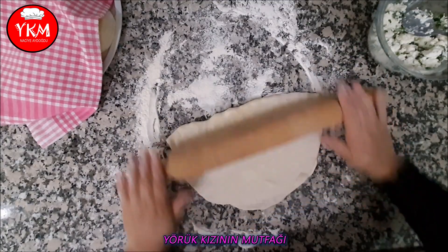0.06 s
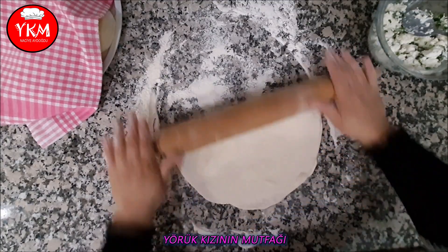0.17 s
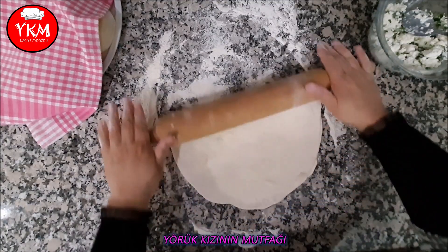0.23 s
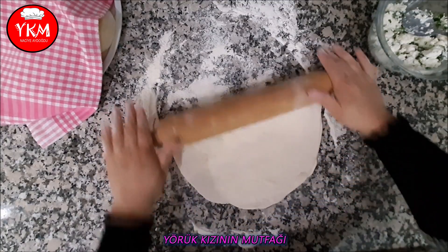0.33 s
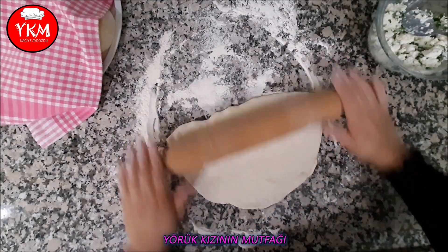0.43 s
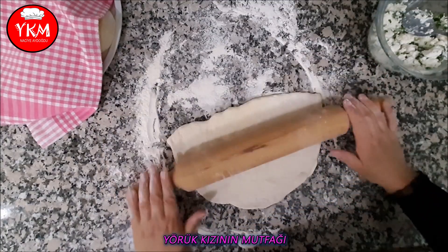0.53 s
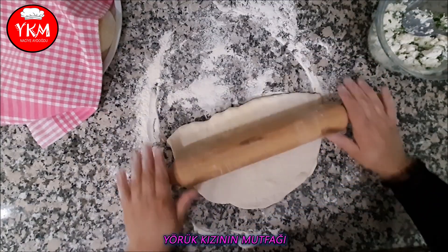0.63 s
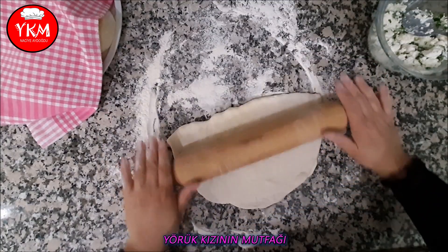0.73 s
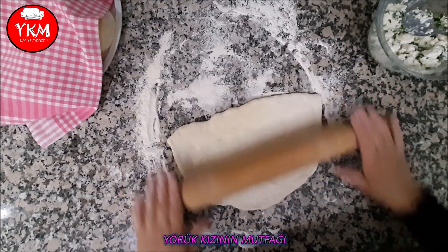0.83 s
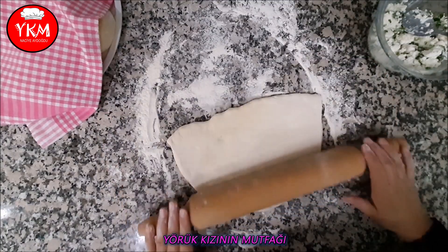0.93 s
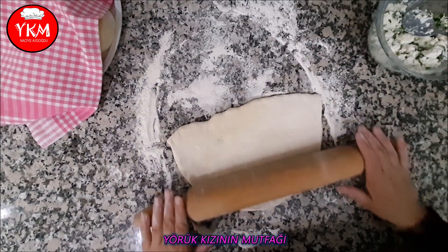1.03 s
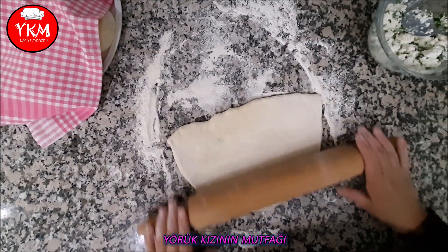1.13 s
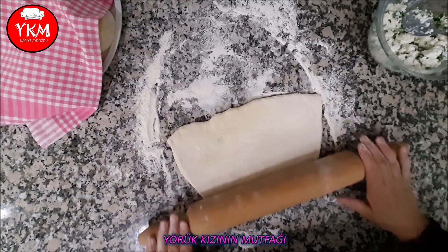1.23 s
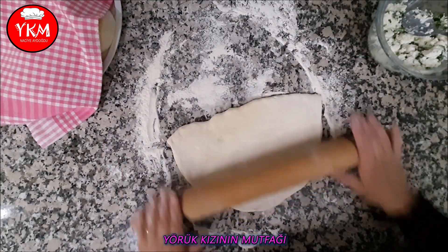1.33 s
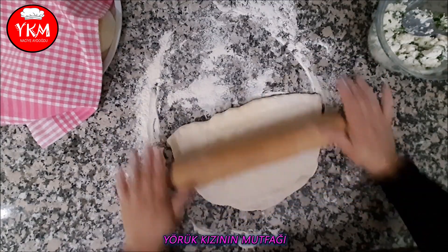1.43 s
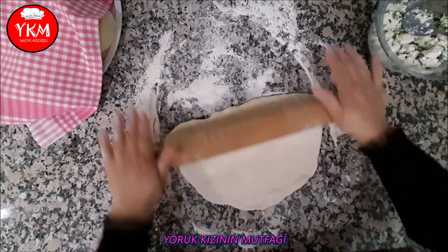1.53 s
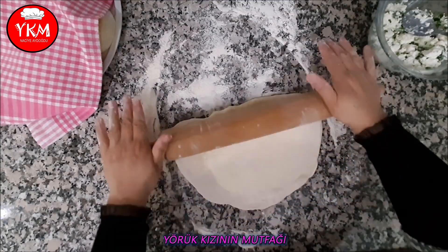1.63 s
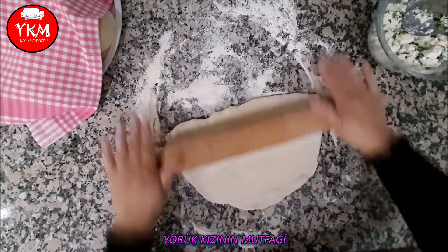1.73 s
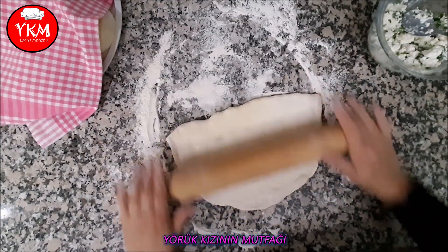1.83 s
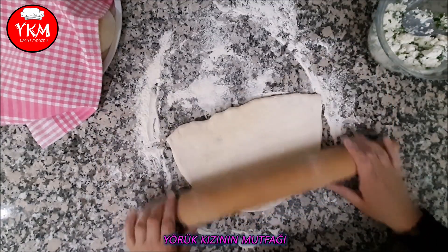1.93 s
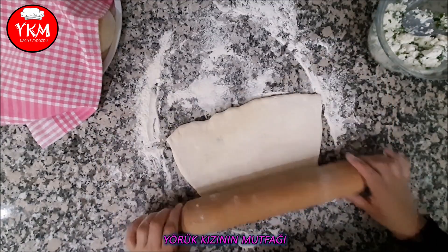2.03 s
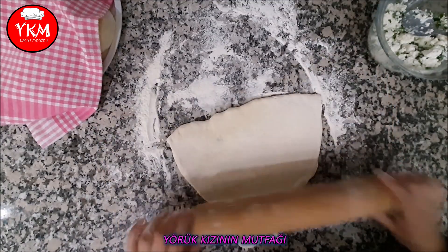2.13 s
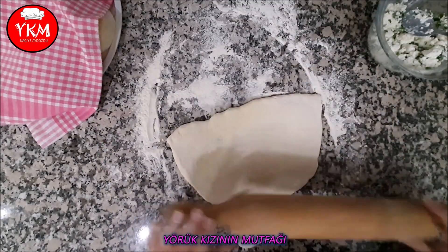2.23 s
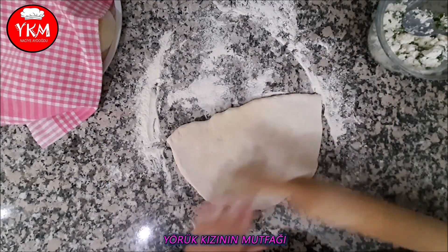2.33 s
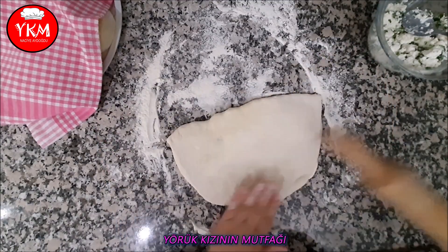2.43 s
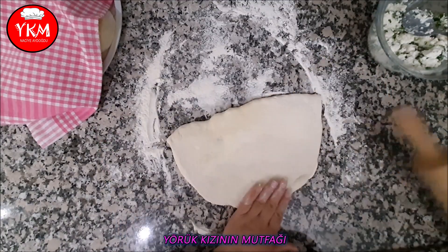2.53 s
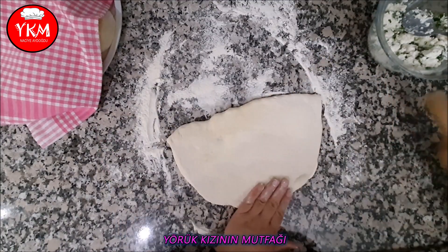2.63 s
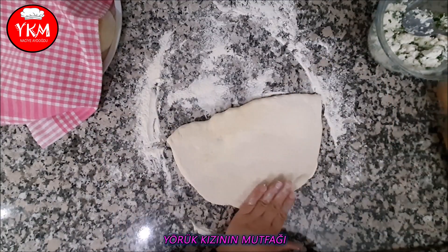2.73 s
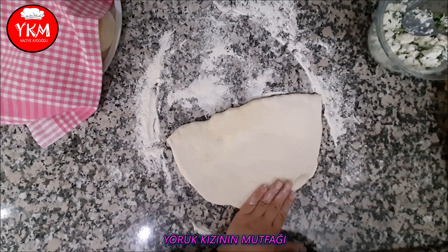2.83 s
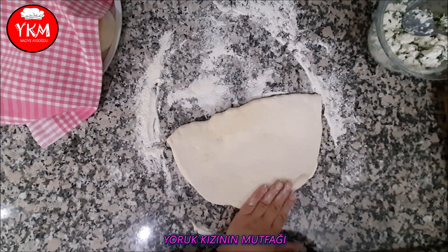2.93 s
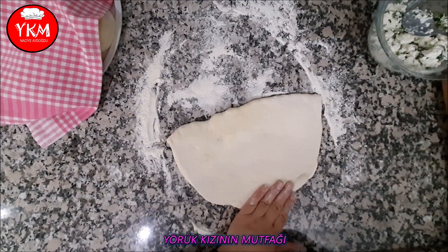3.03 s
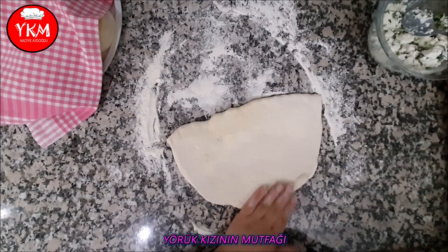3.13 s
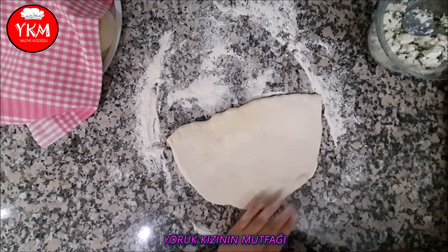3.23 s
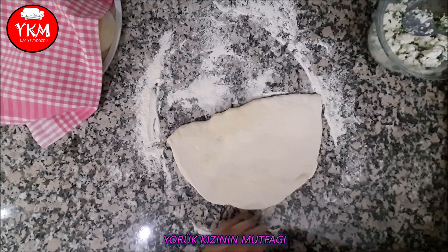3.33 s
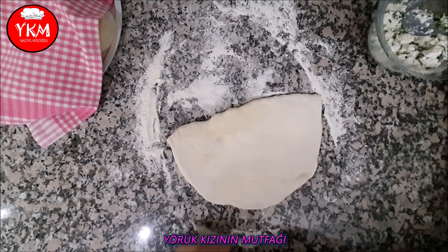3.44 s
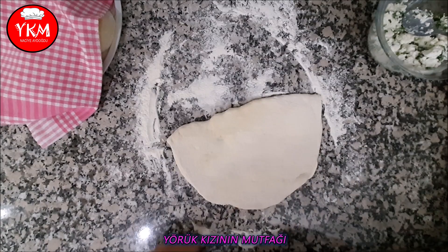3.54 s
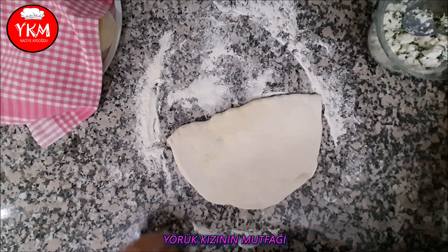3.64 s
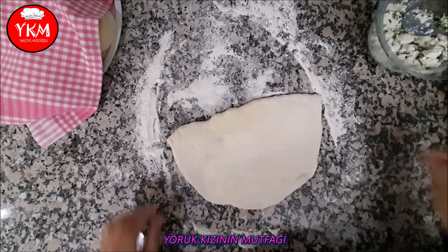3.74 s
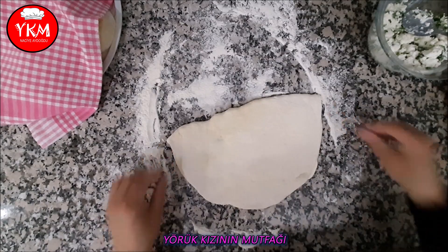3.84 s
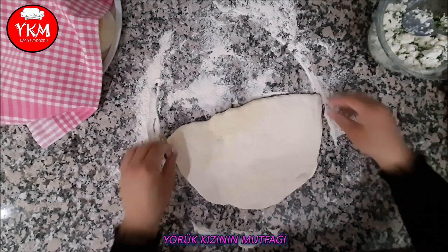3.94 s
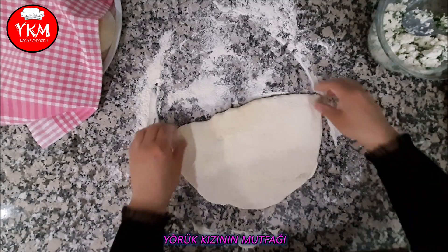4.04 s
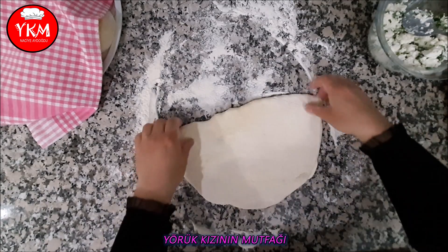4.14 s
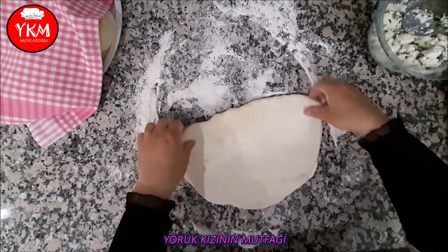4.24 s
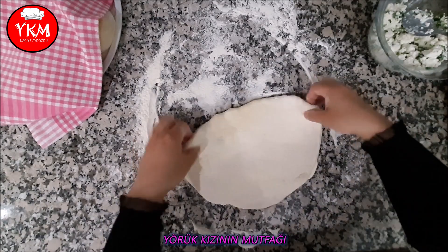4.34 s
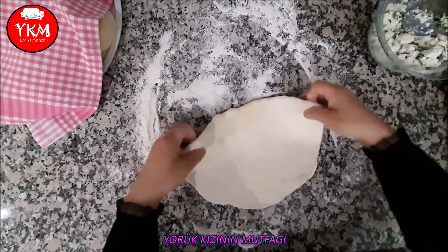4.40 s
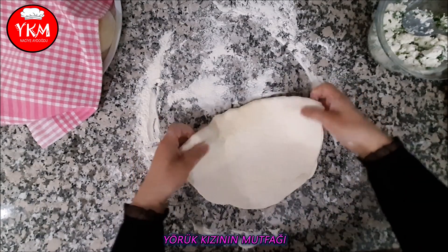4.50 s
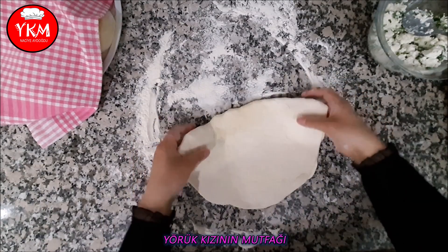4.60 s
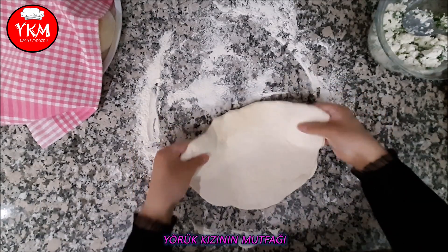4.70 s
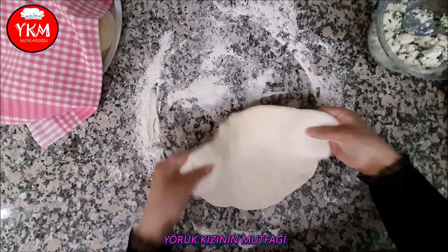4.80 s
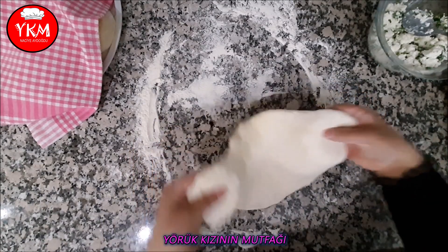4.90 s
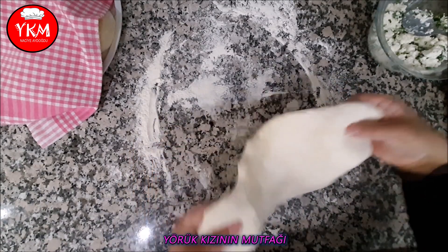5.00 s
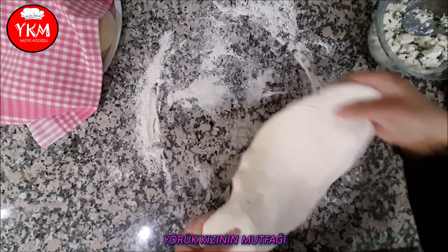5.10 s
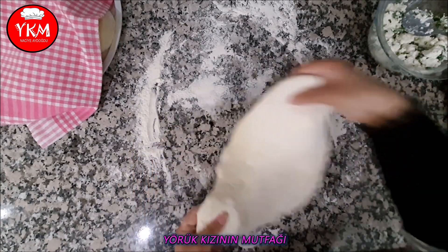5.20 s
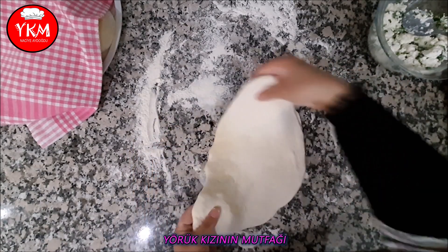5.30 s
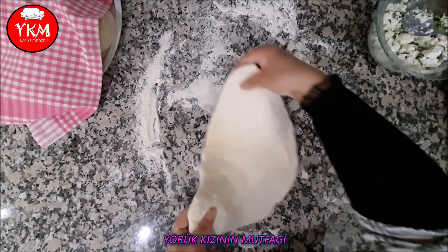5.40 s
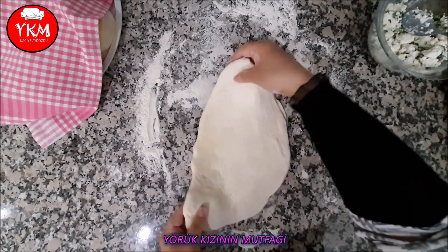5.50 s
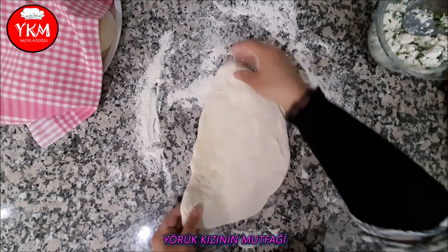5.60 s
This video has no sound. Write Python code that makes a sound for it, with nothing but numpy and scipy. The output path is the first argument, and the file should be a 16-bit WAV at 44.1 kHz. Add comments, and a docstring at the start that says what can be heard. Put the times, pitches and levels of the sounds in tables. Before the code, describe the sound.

Close kitchen sounds: palms hissing on a rolling pin, low rolling rumble, two woody knocks, a faint squeak, then a soft dough slap and scrape.

```python
"""A small kitchen with a stone counter, heard close by on two microphones while an appliance hums.
A wooden rolling pin runs to and fro over floured dough and off it onto flour; palms hiss (friction noise)
and sing (unsteady tones). The pin is set down to the right with two knocks and a soft thump, as dying modes
of wood and counter. A hand strokes the dough and a faint squeak falls in pitch; then the dough is picked up,
flops back as bursts of noise and is dragged through the flour as more friction noise."""
import sys
import numpy as np
from scipy import signal
from scipy.fft import rfft, irfft
from scipy.io import wavfile

SR = 44100
rng = np.random.default_rng(int(sys.argv[2]) if len(sys.argv) > 2 else 0)


def wav_out(sig):
    """Save sig, one row per channel (or a flat mono array), as 16-bit PCM at SR to the path in sys.argv[1]."""
    wavfile.write(sys.argv[1], SR, np.round(np.clip(np.atleast_2d(sig).T, -1, 1) * 32767).astype(np.int16))


N = 249585
TIME = np.arange(N) / SR
BINS = np.fft.rfftfreq(N, 1 / SR)  # Hz


def amp(db):
    """Decibels to gain."""
    return 10 ** (np.asarray(db) / 20)


def unit(x):
    """Scales to rms 1."""
    return x / np.sqrt(np.mean(x ** 2) + 1e-30)


def read(points, hz):
    """Reads a table on a log-frequency axis."""
    f, value = np.transpose(points)
    return np.interp(np.log(hz + 1), np.log(f + 1), value)


def delayed(s):
    """The spectrum of a pure delay in seconds."""
    return np.exp(-2j * np.pi * BINS * s)


def drift(hz):
    """Slow chance of rms 1, up to about a given rate."""
    spectrum = rfft(rng.standard_normal(N))
    return unit(irfft(spectrum / (1 + (BINS / hz) ** 4), N))


# How alike the two microphones hear a noise. Each row: frequency in Hz, left-right likeness (0-1).
MICROPHONE_LIKENESS = [(60, 0.92), (130, 0.96), (290, 0.59), (640, 0.17), (1300, 0), (3000, 0), (15000, 0)]


def paired(x):
    """Spectra of two unrelated signals, made alike in the bass as at two close microphones."""
    a, b = rfft(x)
    same = np.clip(read(MICROPHONE_LIKENESS, BINS), -1, 1)
    return np.array([a, same * a + np.sqrt(1 - same ** 2) * b])


def noise(gain):
    """Stereo noise of rms 1 with a given spectrum."""
    return unit(irfft(paired(rng.standard_normal((2, N))) * gain, N))


def peaks(modes):
    """The gain of a set of resonances (Hz, width Hz, dB), summed as power."""
    power = sum(amp(db) ** 2 / (1 + ((BINS - hz) / width) ** 2 * 2) ** 2 for hz, width, db in modes)
    return np.sqrt(power)


def cut(x, hz, kind, order):
    """A plain high-pass or low-pass."""
    return signal.sosfilt(signal.butter(order, hz, kind, fs=SR, output="sos"), x)


# Every stroke is this far down one rise before and one fall after its peak; the exponent rounds its top.
STROKE_DROP_DB, STROKE_ROUNDNESS = 10, 1.38


def swells(rows):
    """The summed level of strokes (peak s, rise s, fall s, dB) at every sample."""
    t = TIME[::64]
    peak, rise, fall, db = np.transpose(rows)[:, :, None]
    away = np.maximum((peak - t) / rise, (t - peak) / fall)
    power = amp(db - STROKE_DROP_DB * abs(away) ** STROKE_ROUNDNESS) ** 2
    return np.interp(TIME, t, np.sqrt(power.sum(0)))


def ring(modes, rise_s=0):
    """The spectrum of a struck set of dying modes; they start in pairs, one pair up and the next down."""
    t = TIME[:SR]
    swing = 0
    for k, (hz, db, t60) in enumerate(modes):
        sign = (-1) ** (k // 2)
        swing = swing + sign * amp(db - 60 * t / t60) * np.sin(2 * np.pi * hz * t)
    return rfft(swing * t / (t + rise_s + 1e-9), N)


# How long the kitchen lingers. Each row: frequency in Hz, time to die by 60 dB in seconds.
KITCHEN_DECAY = [(100, 0.58), (300, 0.41), (700, 0.4), (1800, 0.5), (3000, 0.41), (8000, 0.27),
                 (15000, 0.25)]


def reverb(x, build_s=0.0087):
    """The kitchen's diffuse tail: sparse taps, each band dying at its own speed."""
    taps = rng.choice([-1., 1.], (2, N)) * (rng.random((2, N)) < 4000 / SR)  # about 4000 taps a second
    hz, t, z = signal.stft(irfft(paired(taps), N)[:, :SR], SR, nperseg=256)
    decay = amp(-60 * t / read(KITCHEN_DECAY, hz)[:, None])
    build = np.minimum(t / build_s, 1) ** 2
    tail = signal.istft(z * decay * build, SR, nperseg=256)[1]
    return signal.fftconvolve(np.atleast_2d(x), tail / np.linalg.norm(tail[0]), axes=1)[:, :N]


def friction(strokes, colour, grain_db, split_hz=9000, flutter_db=1.3, flutter_hz=22):
    """Countless tiny slips of uneven size under wavering pressure; light, quick contact adds fine hiss on top."""
    uneven_db = grain_db * drift(570) + flutter_db * drift(flutter_hz)
    slips = rng.standard_normal((2, N)) * amp(uneven_db)
    z = paired(slips) * amp(read(colour, BINS))
    top = 1 / (1 + (split_hz / (BINS + 1)) ** 12)
    midrange = irfft(z * (BINS > 3200) * (BINS < 8000), N)
    rub = irfft(z * (1 - top), N) / midrange.std()  # the rub's level is counted in this band
    fine_hiss = unit(irfft(z * top, N))
    rub_level = swells([(*when, db) for *when, db, _ in strokes])
    fine_level = swells([(*when, db + fine_db) for *when, db, fine_db in strokes])
    return rub * rub_level + fine_hiss * fine_level


def puffs(rows, colour, t60, tail_db, rise_s=0.00043):
    """Short bursts of coloured noise, with the kitchen's answer."""
    level = 0
    for s, db in rows:
        fade = amp(db - 60 * np.maximum(TIME - s, 0) / t60)
        level = level + fade * np.clip((TIME - s) / rise_s, 0, 1)
    burst = level * noise(amp(read(colour, BINS)))
    return burst + amp(tail_db) * reverb(burst)


# Skin rubbing on the pin, then on the dough. Each row: peak, rise and fall in seconds, rub level in dB,
# fine hiss in dB re rub, cupped-hand ring in dB re rub (before the common trim hollow_db).
RUBS = [(0.17, 0.075, 0.2, -76, 2, -2), (0.55, 0.079, 0.16, -76, 1.5, 1.5),
        (0.67, 0.045, 0.025, -74, 2.5, 3.5), (0.95, 0.16, .07, -78.5, 1, 4),
        (1.052, 0.061, 0.071, -68, 4.5, -5), (1.28, 0.1, 0.045, -82.5, 0, -4),
        (1.56, 0.15, 0.12, -73, 1.5, -5), (1.92, 0.067, .07, -71, 0.5, -8),
        (2.045, 0.063, 0.071, -64.5, 1, -4), (2.115, .025, 0.018, -74.5, 5, -14),
        (2.25, 0.05, 0.078, -76, 2.5, 4.5), (3.183, 0.075, 0.079, -67, 7, 6.5),
        (3.31, 0.054, .06, -82, 7, 14), (3.46, 0.094, 0.097, -77.5, 5, 10),
        (3.97, 0.063, .14, -87, -16, -4), (4.335, 0.15, 0.092, -88, 6, -15),
        (4.55, .04, 0.075, -86, 9, -10), (4.635, 0.025, 0.045, -81.5, -1, -17),
        (4.765, 0.08, 0.074, -80, 3, 3), (5.0, 0.076, 0.09, -84, 8, -10)]
# The colour of skin friction. Each row: frequency in Hz, relative density in dB per Hz.
SKIN_COLOUR = [(300, -26.5), (900, -6), (1600, -0.5), (2400, -5), (3400, -3.5), (4500, 1.5), (6000, -0.5),
               (7700, 0), (8700, -9), (10000, -4.5), (11800, 1.5), (15500, -2)]
# Resonances of the hollow under the cupped hand. Each row: frequency in Hz, width in Hz, relative level in dB.
HAND_HOLLOW = [(1360, 440, 0.5), (1990, 150, 1), (2795, 340, -2), (4480, 230, -8), (6150, 110, -7.5),
               (8160, 340, -25)]


def palms(hollow_db=-1.0):
    """Skin rubs on wood and dough, and the hollow under the cupped hand colours the hiss."""
    cupping = swells([(*when, db + ring_db + hollow_db) for *when, db, _, ring_db in RUBS])
    skin = friction([row[:-1] for row in RUBS], SKIN_COLOUR, grain_db=0.5)
    return skin + noise(peaks(HAND_HOLLOW)) * cupping


# The palms grip the wood at the end of a stroke. Each row: peak, rise and fall in seconds, level in dB.
GRIPS = [(1.072, 0.052, 0.061, -67), (2.04, 0.036, 0.079, -61)]
# The notes of the gripped wood. Each row: frequency in Hz, width in Hz, relative level in dB.
GRIP_TONES = [(1280, 44, 2.5), (1870, 32, -6), (1994, 41, 3), (2794, 36, -5.5), (2935, 53, -6),
              (4330, 110, -11)]


def singing(waver_hz=110, fuzz_db=-5):
    """Skin that half sticks to the wood gives a few unsteady tones in a fuzz of their own pitch."""
    tones = 0
    for hz, width, db in GRIP_TONES:
        turns = np.cumsum(hz + width / 2 * drift(waver_hz)) / SR
        start = np.pi * rng.random((2, 1))  # its own phase at each microphone
        tones = tones + amp(db) * np.sin(2 * np.pi * turns + start)
    fuzz = amp(fuzz_db) * noise(peaks(GRIP_TONES))
    return (unit(tones) + fuzz) * swells(GRIPS)


# The pin's weight bearing on the counter. Each row: peak, rise and fall in seconds, level in dB.
PRESSES = [(.35, .6, 0.38, -69.5), (1.07, 0.069, 0.11, -61), (1.62, .08, 0.15, -55.5),
           (1.98, 0.089, .2, -65)]
# The colour of the rolling rumble. Each row: frequency in Hz, relative density in dB per Hz.
RUMBLE_COLOUR = [(30, -10), (60, -2), (110, 11.5), (160, 6), (220, -9.5), (400, -9), (900, -17),
                 (3000, -83)]


def rumble():
    """The pin bumps over the dough and shakes the counter."""
    return noise(amp(read(RUMBLE_COLOUR, BINS))) * swells(PRESSES)


# The pin set down, then settling. Each row: start in seconds, wood level in dB (before wood_db), contact
# cut-off in Hz, push on the counter in dB, tuning of the wood as a factor, grit tick in dB.
KNOCKS = [(2.8645, -17, 2450, -35, 1.007, -65.5), (3.0627, -16, 1580, -35, 0.991, -65.5),
          (3.4208, -28, 368, -41.5, 0.99, -85), (3.4584, -32, 274, -56, 0.88, -85)]
# Modes of the pin on the stone, before tuning.
# Each row: frequency in Hz, relative level in dB, time to die by 60 dB in seconds.
PIN_MODES = [(168.5, -6.5, 0.033), (360, -9, 0.022), (568, -3, 0.021), (726, -10, 0.017),
             (895, -7.5, 0.031), (1052, 0, 0.0097), (1316, -17.5, 0.033), (1535, -8, 0.014),
             (1917, -26, 0.039), (2000, -22, 0.021), (2670, -17.5, 0.014), (2880, -15.5, 0.018)]
# Modes of the counter under it. Each row: frequency in Hz, relative level in dB, time to die by 60 dB in seconds.
COUNTER_MODES = [(62.5, -8, 0.23), (105.35, 3, 0.36), (140, -24, 0.047), (176.8, -15, 0.58),
                 (255.2, -15, 0.57), (286.6, -9, 0.31), (329.6, 1, 0.24), (467, -17.5, 0.28),
                 (554.7, -7, 0.54), (700, -9.5, 0.46), (756, -4.5, 0.35), (885, 0, 0.17), (913, -4.5, 0.1)]
# Echoes off wall tiles and cupboards. Each row: delay at the left and at the right microphone in seconds,
# gain as a factor (before echo_db).
WALL_ECHOES = [(.0036, 0.00302, 0.58), (.0064, 0.006335, 0.78), (.0089, 0.0098, 0.17), (0.012, 0.016, 0.19),
               (0.021, 0.039, 0.085), (0.031, .0312, .2), (.0385, .0385, 0.17), (0.0485, 0.09, 0.18)]
PIN_TOP_HZ = 3360  # the wood's ring ends here


def knocks(right_lead_s=0.00042, echo_db=2.0, tail_db=-1.5, boom_tail_db=-13, low_hz=52, right_db=1.2,
           wood_db=4.0, wood_rise_s=0.0015):
    """Each contact rings the pin and the counter; a softer contact loses the high modes."""
    wood, boom = 0, 0
    counter = ring(COUNTER_MODES, rise_s=0.004)  # the heavy slab takes a moment to swing up
    for s, db, contact_hz, push_db, tuning, _ in KNOCKS:
        softness = 1 + 1j * np.sqrt(2) * BINS / contact_hz - (BINS / contact_hz) ** 2
        blow = delayed(s) / softness
        pin = ring([(hz * tuning, mode_db, t60) for hz, mode_db, t60 in PIN_MODES], rise_s=wood_rise_s)
        wood = wood + amp(db + wood_db) * blow * pin
        boom = boom + amp(push_db) * blow * counter
    direct = np.array([delayed(right_lead_s), delayed(0)])  # the right microphone hears it first
    echoes = sum(gain * np.array([delayed(left), delayed(right)]) for left, right, gain in WALL_ECHOES)
    near = irfft(wood * (direct + amp(echo_db) * echoes) + boom, N)
    into_room = irfft(amp(tail_db) * wood + amp(boom_tail_db) * boom, N)
    out = near + reverb(into_room, build_s=0.0085)
    out = out * amp(right_db * np.array([[-.5], [.5]]))
    out = cut(out, low_hz, "highpass", order=5)
    return cut(out, PIN_TOP_HZ, "lowpass", order=7)


# Flour crushed at the contact. Each row: frequency in Hz, relative density in dB per Hz.
GRIT_COLOUR = [(1000, -30), (3000, 0), (4500, 0.5), (6000, -8), (8700, -21), (12000, -11), (15500, -7.5)]


def grit():
    """Flour is crushed under the pin as it lands: a puff of noise at each knock."""
    return puffs([(row[0], row[-1]) for row in KNOCKS], GRIT_COLOUR, t60=0.093, tail_db=0.5)


# The dough flopping down. Each row: start in seconds, level in dB.
FLOPS = [(5.3183, -46.5), (5.3267, -60)]
# The colour of the slap. Each row: frequency in Hz, relative density in dB per Hz.
FLOP_COLOUR = [(100, -21), (400, 4), (800, 1.5), (1200, 9), (1800, -5), (3000, -9), (5000, -13),
               (8700, -44), (12000, -22), (15500, -28)]


def flop():
    """Soft dough slaps the stone and puffs out the air under it."""
    return puffs(FLOPS, FLOP_COLOUR, t60=0.063, tail_db=-10)


# Dough sliding over flour, and at 2.115 s the pin rolling off the dough onto flour. Each row: peak, rise and
# fall in seconds, rub level in dB, fine hiss in dB re rub, share of dull skid (0-1, of the power).
FLOUR_CONTACTS = [(0.825, .035, 0.064, -72.5, -17, 1), (2.115, 0.029, 0.019, -65.5, 1, 0.1),
                  (5.322, 0.0096, 0.036, -68, -1, 0.65), (5.37, 0.052, 0.18, -72.5, -3.5, 0.02),
                  (5.565, 0.11, 0.064, -71.5, -5.5, 0.08), (5.63, 0.055, .024, -71.5, 6, 0.01)]
# The duller scuff of a skid on flour. Each row: frequency in Hz, relative density in dB per Hz.
SKID_COLOUR = [(200, 14), (700, 12), (1700, 12.5), (2600, 3.5), (3600, 1.5), (5600, -1), (6800, -8),
               (8700, -19), (11800, -4), (15500, -35)]
# The fine crunch of flour. Each row: frequency in Hz, relative density in dB per Hz.
FLOUR_COLOUR = [(200, -32), (600, -4), (1400, 6), (2500, 8.5), (3600, 7.5), (5700, 3), (7700, -4),
                (8700, -21), (11800, -19.5), (15500, -20)]


def floured_stone():
    """Dough slides over flour, and once the pin rolls onto it: part dull skid, part fine crunch."""
    skids, crunches = [], []
    for *when, db, fine_db, dull in FLOUR_CONTACTS:
        dull = np.clip(dull, .001, .999)  # keeps both logarithms finite
        skids.append((*when, db + 10 * np.log10(dull), fine_db))
        crunches.append((*when, db + 10 * np.log10(1 - dull), fine_db))
    return friction(skids, SKID_COLOUR, grain_db=2.5) + friction(crunches, FLOUR_COLOUR, grain_db=0.5)


# A faint falling squeak: when it peaks, how it swells, its mean pitch at the peak and how that sags.
SQUEAK_AT_S, SQUEAK_RISE_S, SQUEAK_FALL_S, SQUEAK_DB = 3.795, 0.028, 0.06, -59.5
SQUEAK_PITCH_HZ, SQUEAK_SAG_HZ_PER_S = 472.6, 700


def squeak(waver=0.036, tail_db=-6):
    """One soft, unsteady tone that slides down."""
    hz = SQUEAK_PITCH_HZ - SQUEAK_SAG_HZ_PER_S * (TIME - SQUEAK_AT_S)
    turns = np.cumsum(hz * (1 + waver * drift(79))) / SR
    level = swells([(SQUEAK_AT_S, SQUEAK_RISE_S, SQUEAK_FALL_S, SQUEAK_DB)])
    tone = np.sqrt(2) * np.sin(2 * np.pi * turns) * level
    return tone + amp(tail_db) * reverb(tone)


# The appliance's hum and whine. Each row: frequency in Hz, level in dB, waver as a share of the tone.
HUM_TONES = [(102.4, -64, 0.34), (591.2, -67.5, 0.034)]
# The steady rush of air. Each row: frequency in Hz, relative density in dB per Hz.
AIR_COLOUR = [(22, -40.5), (36, -20), (58, -5.5), (85, -5.5), (135, -4), (210, -18), (600, -20.5),
              (1000, -32), (1800, -37.5), (2500, -43.5), (6000, -49.5), (8700, -58), (12000, -49),
              (15500, -44)]
# The appliance's housing colours the rush. Each row: frequency in Hz, width in Hz, relative level in dB.
HOUSING_RESONANCES = [(677, 230, -3.5), (945, 51, 1), (1172, 380, -8), (1497, 110, -4), (2070, 130, -11)]


def background(air_db=-62, housing_db=-75, waver_hz=6):
    """An appliance hums and whines over the low rush of its fan."""
    hum = 0
    for hz, db, waver in HUM_TONES:
        wander = 1 + waver * (drift(waver_hz) + 1j * drift(waver_hz))  # in level and phase
        hum = hum + amp(db) * (wander * np.exp(2j * np.pi * hz * TIME)).real
    air = amp(air_db) * noise(amp(read(AIR_COLOUR, BINS)))
    housing = amp(housing_db) * noise(peaks(HOUSING_RESONANCES))
    return np.sqrt(2) * hum + air + housing


def scene():
    """All sources at the two microphones."""
    pin_and_palms = palms() + singing() + rumble()
    setting_down = knocks() + grit()
    return pin_and_palms + setting_down + flop() + floured_stone() + squeak() + background()


# The colour difference of the two microphones. Each row: frequency in Hz, left minus right in dB.
MICROPHONE_BALANCE = [(60, 0.5), (200, 3), (600, 2.7), (1300, 4.5), (2400, 3), (4400, 1.4), (8000, 0.5),
                      (15000, 0)]
EDGE_HZ = 15720  # upper band limit


def record(dry):
    """The two microphones differ a little in colour; then the band limit."""
    tilt = amp(np.array([[.5], [-.5]]) * read(MICROPHONE_BALANCE, BINS))
    coloured = irfft(rfft(dry) * tilt, N)
    band_limit = signal.firwin(801, EDGE_HZ, window=("kaiser", 8), fs=SR)
    return signal.oaconvolve(coloured, band_limit[None], "same")


dry = scene()
out = record(dry)
wav_out(out)
```